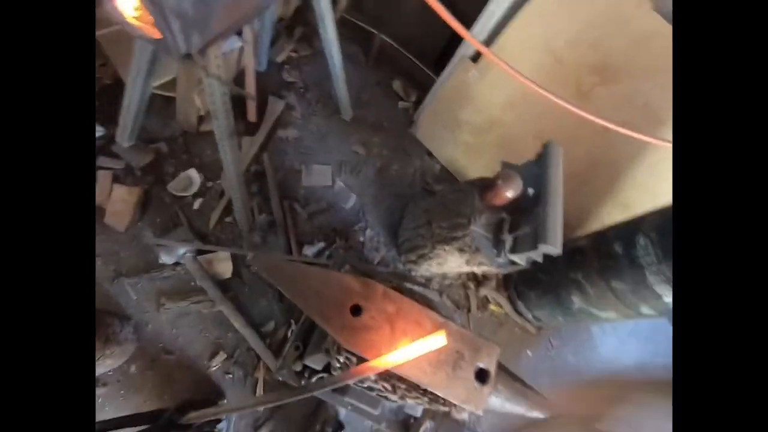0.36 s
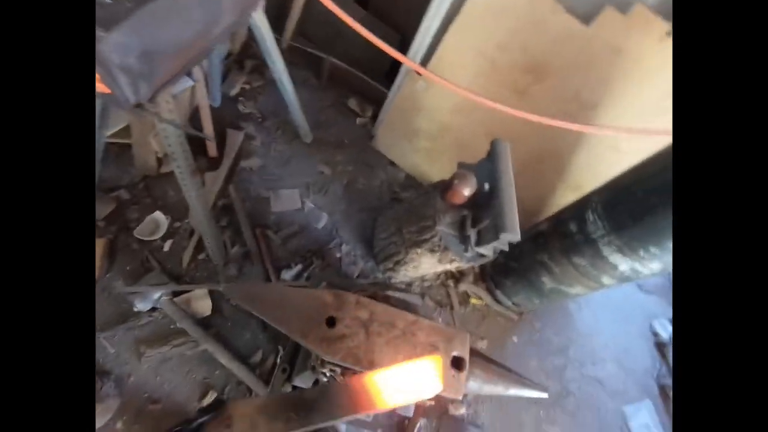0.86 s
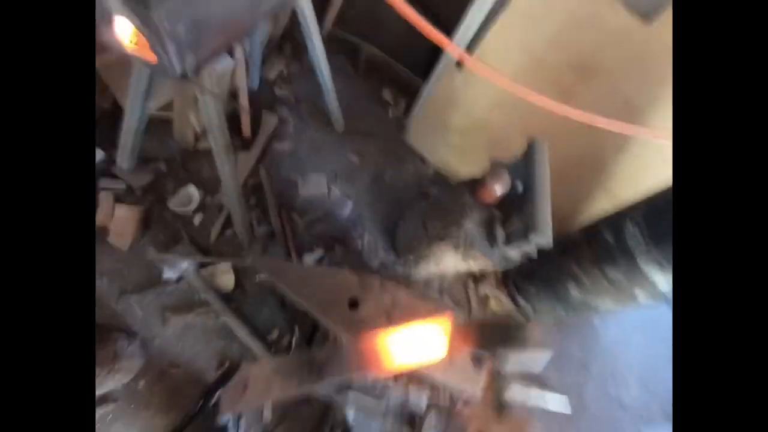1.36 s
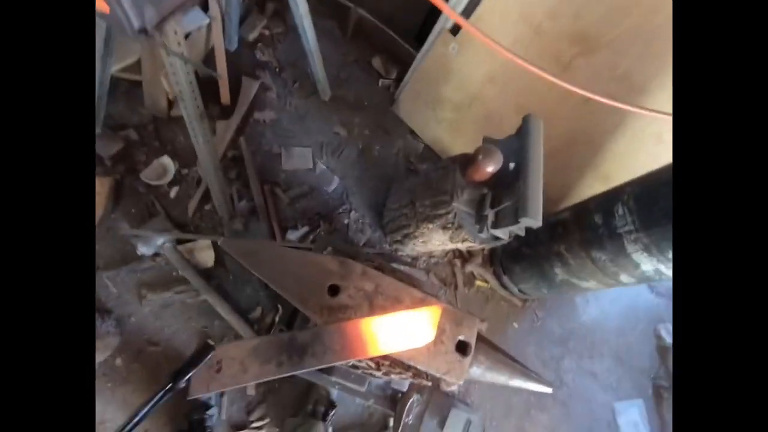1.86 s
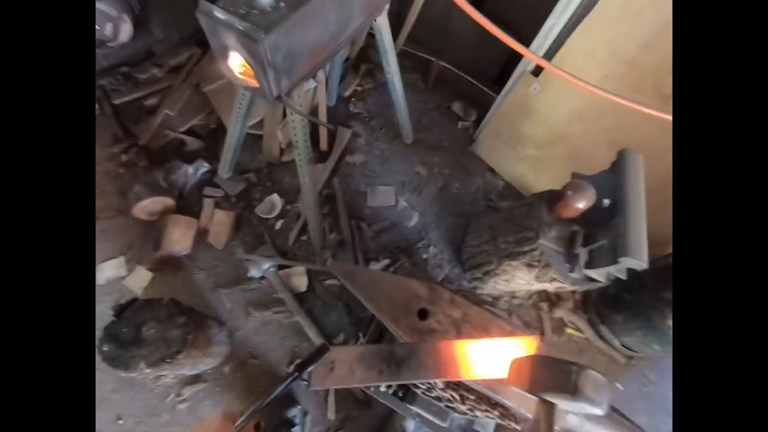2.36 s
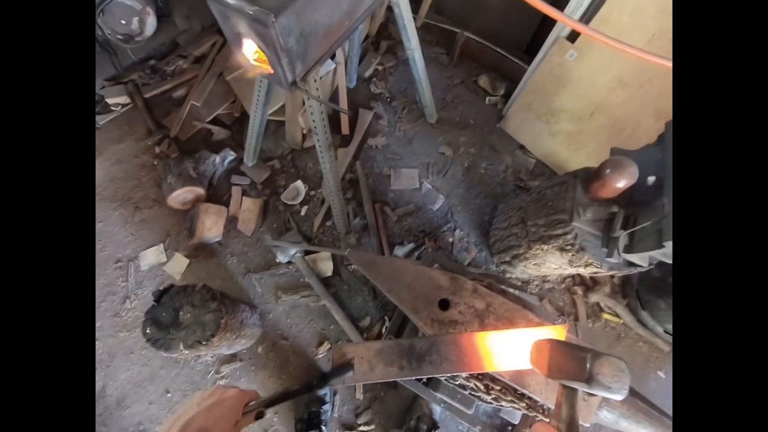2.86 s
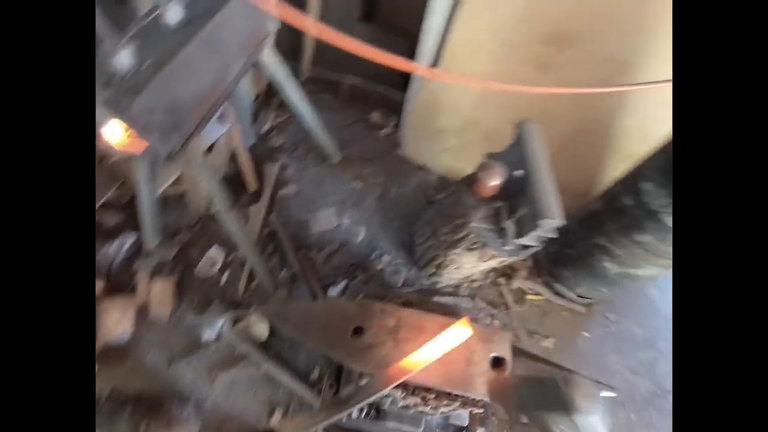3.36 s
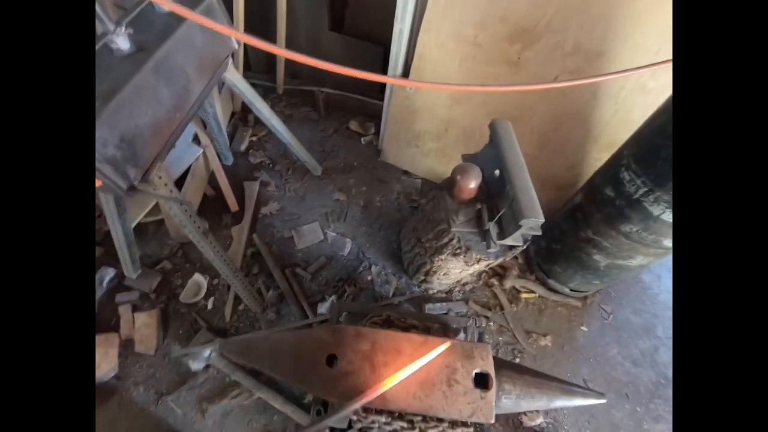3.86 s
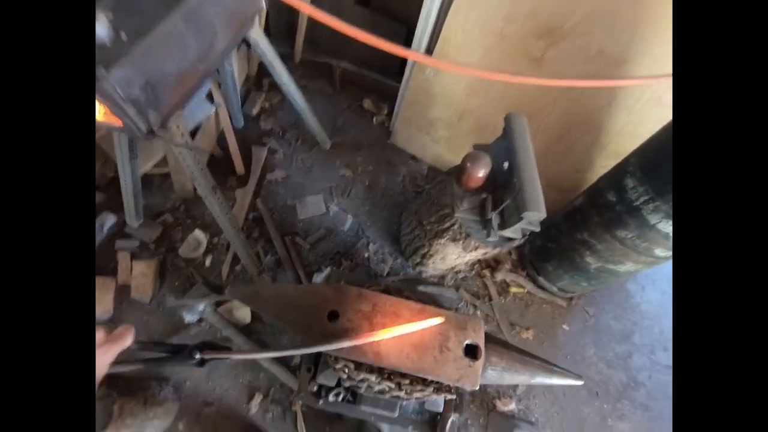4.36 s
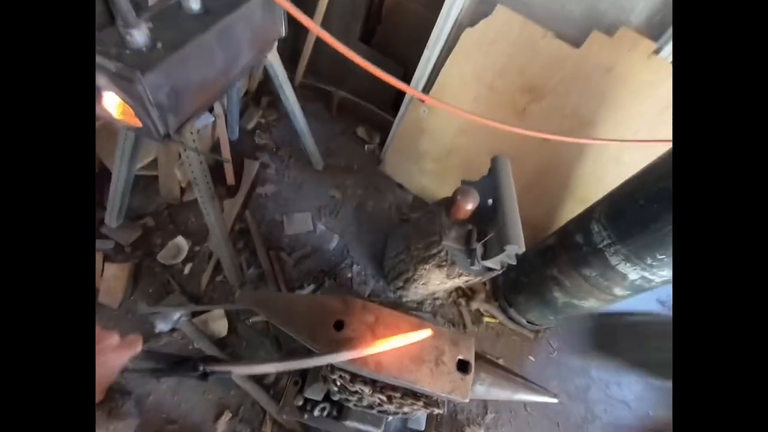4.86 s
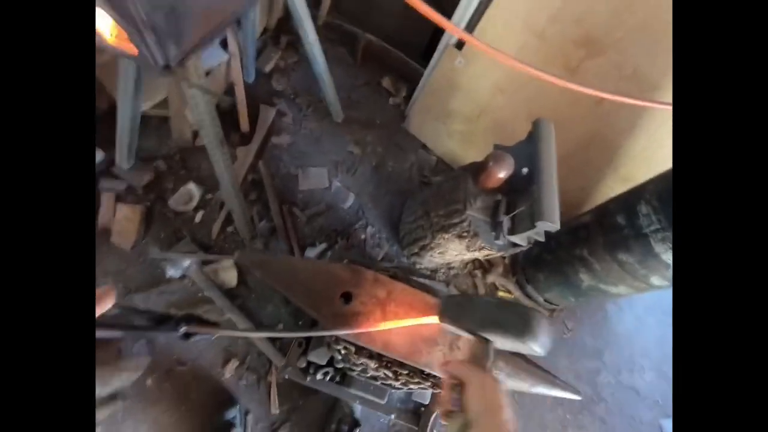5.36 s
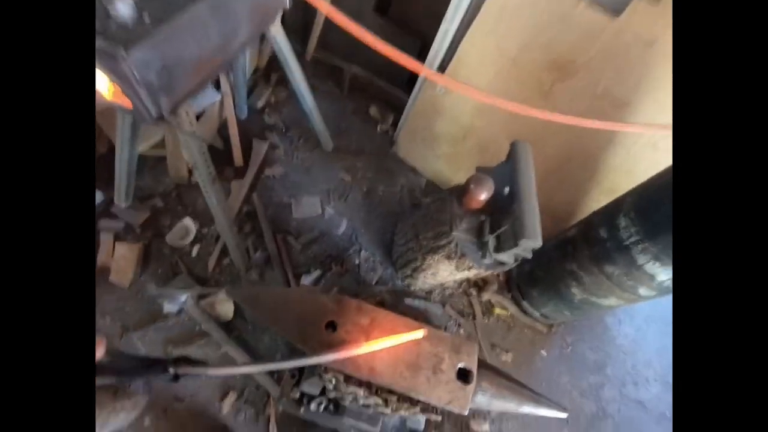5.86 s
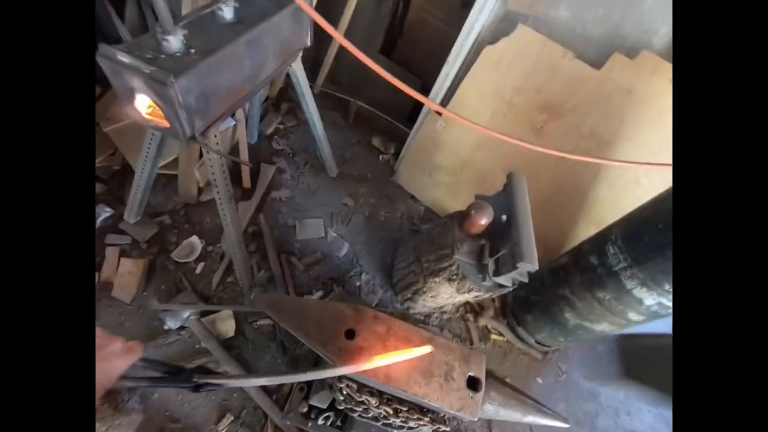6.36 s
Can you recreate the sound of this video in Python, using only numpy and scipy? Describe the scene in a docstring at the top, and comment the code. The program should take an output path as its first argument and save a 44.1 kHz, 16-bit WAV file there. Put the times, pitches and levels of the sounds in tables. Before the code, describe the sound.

Six hard hammer blows on hot steel over an anvil, each a dull crack with short ring, above a steady low gas forge roar.

```python
"""A gas forge roars and hisses beside an anvil while a hand hammer strikes hot steel six times, with three
light taps between. Each blow is a short thud with a crack, a ringing anvil, a shop echo and a low rumble;
faint ticks come too. Flame, jet and echo are shaped noise, struck steel is dying sine waves.
A small camera with two ports ducks hard at each blow, so ring and echo seem to hang before they die;
a slower stage of its limiter lets the forge swell in the pauses."""
import sys
import numpy as np
from scipy import signal
from scipy.io import wavfile
from scipy.ndimage import uniform_filter1d

SR = 44100
rng = np.random.default_rng(int(sys.argv[2]) if len(sys.argv) > 2 else 0)


def pcm_store(signal):
    """Save signal as 16-bit PCM."""
    levels = np.round(np.clip(np.atleast_2d(signal), -1, 1) * 32767)
    wavfile.write(sys.argv[1], SR, levels.astype(np.int16).T)


def makeup_ratio(level_db):
    """Linear amplitude ratio for a level in decibels (20 dB per factor of ten)."""
    decades = np.asarray(level_db, float) / 20
    return 10 ** decades


N = 285327  # length in samples

# The hammer blows. Each row: start in seconds, then the levels in dB of thud, snap, ring and rumble.
BLOWS = [(0.3728, 11.5, -16, -35.5, -33.5), (1.1994, 10, 6, -24.5, -35.5), (1.9285, 10, 5.5, -29.5, -32.5),
         (4.5808, 15.5, -1, -21.5, -35), (5.3121, 13.5, -14, -24, -31), (6.0445, 13.5, -4, -18, -32)]
# How the forge leans to one side. Each row: pitch in Hz, left level over right in dB.
FORGE_LEAN = [(60, -1), (130, -1.5), (290, -5.5), (640, -6.5), (1410, 5), (3100, 3.5), (6820, -1.5),
              (15000, 4.5)]


def read(points, hz):
    """Reads a curve of (Hz, value) points, with straight lines between them on a log-frequency axis."""
    f, value = np.transpose(points)
    return np.interp(np.log(hz + 1), np.log(f + 1), value)


def add(mix, s, sound):
    """Mixes a two-channel sound in at s seconds, cut off where the mix ends."""
    part = mix[:, round(s * SR):][:, :sound.shape[1]]
    part += sound[:, :part.shape[1]]


def sides(lean_db):
    """Left and right gains for a left-over-right level difference."""
    return makeup_ratio(np.array([lean_db / 2, -lean_db / 2]))


def noise(field_db, lean, count, size):
    """Noise from random short-time spectra of level field_db(hz, t); the two ports' mean starts at rms 1."""
    # How alike the ports hear a sound. Each row: pitch in Hz, likeness from 0 to 1.
    likeness = [(30, .75), (100, .96), (200, .995), (400, .98), (700, .85), (1500, .9), (4000, .7),
                (9000, .65), (15000, .7)]
    # How far the left port runs ahead. Each row: pitch in Hz, phase lead in radians.
    left_lead = [(30, 0.01), (340, 0.13), (1210, 1.9), (2150, 1.64), (2840, .1), (4390, 0.2), (6370, 2.47),
                 (8700, 2), (11100, 17), (12100, 9.5), (15300, 6.2)]
    hop = size // 4
    frames = count // hop + 5
    hz = np.fft.rfftfreq(size, 1 / SR)[:, None]
    a, b, c, d = rng.standard_normal((frames, len(hz), 4)).T
    shared, own = a + 1j * b, c + 1j * d
    same, lead = np.clip(read(likeness, hz), 0, 1), read(left_lead, hz)
    left, right = sides(read(lean, hz))
    mean = np.sqrt(left ** 2 + right ** 2 + 2 * left * right * same * np.cos(lead)) / 2
    at_left = left * np.exp(1j * lead) * shared
    at_right = right * (same * shared + np.sqrt(1 - same ** 2) * own)
    field = makeup_ratio(field_db(hz, np.arange(frames) * hop / SR))
    spectra = np.array([at_left, at_right]) * field / mean / np.linalg.norm(field[:, 0])
    return signal.istft(spectra, nperseg=size, noverlap=size - hop)[1][:, :count]


def flame():
    """The flame is low noise; the forge box makes it boom at a few pitches."""
    # Flame noise. Each row: pitch in Hz, relative level in dB per Hz.
    roar = [(12, -61), (20, -12.5), (43, -27), (91, -3.5), (129, -3.5), (244, 2.5), (325, -9.5), (352, -16),
            (524, -16.5), (624, -24), (900, -28), (1170, -77), (1980, -120)]
    # Booming pitches of the forge box. Each row: pitch in Hz, width in Hz, relative level in dB.
    chamber = [(186, 12.3, 5), (250.6, 12.6, 2.5), (471, 109, -16.5)]

    def roar_db(hz, t):
        boom = sum(makeup_ratio(2 * db) / (1 + (2 * (hz - f) / width) ** 4) for f, width, db in chamber)
        return 10 * np.log10(makeup_ratio(2 * (read(roar, hz) - 2.5)) + boom) + 0 * t  # 0 * t: steady in time
    return makeup_ratio(-25) * noise(roar_db, FORGE_LEAN, count=N, size=4096)


def jet():
    """The gas jet hisses and sputters: patches of the noise rise and fall over time and pitch."""
    # Jet noise. Each row: pitch in Hz, relative level in dB per Hz.
    hiss = [(530, -51.5), (900, -11), (967, -6), (1090, -7), (1560, -17), (1890, -17), (2370, -23.5),
            (3770, -22.5), (4200, -32.5), (5260, -26.5), (7710, -27), (10500, -38), (13500, -30.5),
            (15600, -79)]
    patchy_db = 1.5

    def hiss_db(hz, t):
        patches = rng.standard_normal((len(t), len(hz))).T
        patches = uniform_filter1d(patches, size=24, axis=0)
        patches = uniform_filter1d(patches, size=12, axis=1)
        patches[:, 0] = 0  # a plain first frame sets the level
        return read(hiss, hz) + patchy_db * patches / patches.std()
    return makeup_ratio(-54) * noise(hiss_db, FORGE_LEAN, count=N, size=1024)


def dying(hz, t60, t):
    """A struck tone: a sine wave that falls by 60 dB in t60 seconds."""
    return makeup_ratio(-60 * t / t60) * np.sin(2 * np.pi * hz * t)


def thud(db):
    """Soft steel gives way under the blow: a few very short tones that build up within a millisecond."""
    # Tones of the thud. Each row: pitch in Hz, time to fall by 60 dB in seconds, relative level in dB.
    tones = [(753, 0.0022, 7.5), (1198, 0.006, -4.5), (2215, 0.0027, 0), (3700, 0.0048, -4)]
    t = np.arange(SR // 2) / SR
    push = sum(makeup_ratio(tone_db) * dying(hz, t60, t) for hz, t60, tone_db in tones) * (1 - np.exp(-t / 0.00051))
    # a high-pass keeps the thud free of bass
    push = signal.sosfilt(signal.butter(3, 480, "high", fs=SR, output="sos"), push)
    late = np.roll(push, shift=4)  # the right port hears it four samples later
    return makeup_ratio(db) * sides(-5.0)[:, None] * np.array([push, late])


def stand(thud_db):
    """The stand under the anvil hums: one low tone with a soft start."""
    hz, t60, db = 101, 0.41, -27  # Hz, seconds, dB against the thud
    t = np.arange(SR // 2) / SR
    hum = dying(hz, t60, t) * (1 - np.exp(-t / 0.0099))
    return -makeup_ratio(thud_db + db) * sides(-1.0)[:, None] * hum


def crack(db):
    """The hammer face meets the steel: a burst of about three cycles with grit, that stops short."""
    hz, peak_s, width_s, grit_share = 6200, 0.00058, 0.00028, 0.44
    t = np.arange(SR // 200) / SR
    band = signal.butter(2, [2500, 12000], "band", fs=SR, output="sos")
    grit = signal.sosfilt(band, rng.standard_normal((2, len(t))))
    burst = np.exp(-((t - peak_s) / width_s) ** 2)
    return makeup_ratio(db) * sides(-5.5)[:, None] * burst * (np.sin(2 * np.pi * hz * t) + grit_share * grit)


def snap(db, hz, grit):
    """A sharp contact: a few fast cycles, a second note at a set ratio to them, and grit."""
    t60, grit_t60 = 0.0055, 0.0083  # seconds
    second_ratio, second_db = 0.29, -1
    t = np.arange(SR // 20) / SR
    band = signal.butter(2, [1100, 9500], "band", fs=SR, output="sos")
    rough = signal.sosfilt(band, rng.standard_normal((2, len(t))))
    notes = dying(hz, t60, t) + makeup_ratio(second_db) * dying(second_ratio * hz, t60, t)
    gritty = notes + grit * makeup_ratio(-60 * t / grit_t60) * rough
    return makeup_ratio(db) * gritty * (1 - np.exp(-(t / 0.000062) ** 2))


def echo(db, tilt_db):
    """The shop answers a hit with noise that dies band by band; tilt_db brightens or dulls it."""
    # Colour of the echo. Each row: pitch in Hz, relative level in dB per Hz.
    colour = [(40, -27.5), (70, 11.5), (190, 11.5), (500, -1.5), (1100, -6), (1500, -8), (2200, -10),
              (3600, -6.5), (4650, -14), (6750, -2.5), (9000, -11.5), (12400, -26), (15600, -66)]
    # How long the echo lasts. Each row: pitch in Hz, time to fall by 60 dB in seconds.
    echo_t60 = [(100, 0.38), (500, 0.46), (1500, 0.38), (4000, 0.39), (8000, 0.31), (9400, 0.21),
                (14000, 0.17)]
    # How the echo leans to one side. Each row: pitch in Hz, left level over right in dB.
    echo_lean = [(60, -7.5), (180, -2.5), (550, -10.5), (1650, 0.5), (4970, -4.5), (15000, 2)]

    def echo_db(hz, t):
        return read(colour, hz) + tilt_db * np.log2(1 + hz / 2000) - 60 * t / read(echo_t60, hz)
    count = SR // 2
    tail = noise(echo_db, echo_lean, count=count, size=1024)
    return makeup_ratio(db) * tail * (1 - np.exp(-np.arange(count) / SR / 0.00014))


def blow(thud_db, snap_db):
    """A hammer blow: echo, thud, stand and crack, then the hammer face touches a second time."""
    rebound_s = 0.0013
    # a blow with more snap for its thud has a brighter echo
    out = echo(thud_db - 23, tilt_db=0.2 * (snap_db - thud_db))
    out += thud(thud_db) + stand(thud_db)
    add(out, 0, crack(snap_db))
    add(out, rebound_s, snap(snap_db - 8, 6500, grit=0.99))
    add(out, rebound_s, snap(snap_db - 7, 3630, grit=0.3))
    return out


def ring(s, db, struck_db, grip, depth):
    """The anvil's own tones, set ringing by the blow; late returns from the walls make them swell or dip."""
    # The anvil's tones: one pitch in Hz each.
    anvil_hz = [1832, 2103, 2147, 2590, 3176, 3470, 3601, 3664, 4112, 4424, 4884, 5041, 5310, 5554, 6058,
                6480, 6893, 8341, 8702, 10152, 10541, 11988, 13849, 15298]
    # One row per tone: free time to fall by 60 dB in seconds, left level over right in dB,
    # swell as the share that the walls add (or cancel, if negative).
    ringing = [(0.3, -2, 0.18), (0.42, 8, 0.3), (0.4, -1, 0.32), (0.41, 2, 0.57), (0.3, 1, -0.13),
               (0.37, -4, 0.051), (0.45, -1, 0.74), (0.34, -3, -0.25), (0.42, -1, 0.6), (0.41, 3, 0.73),
               (0.23, 5, 0.3), (0.49, -7, 0.9), (0.2, -9, 0.25), (0.29, -8, -0.35), (1.0, -13, 0.43),
               (0.25, -16, 0.3), (0.36, -7, -0.017), (0.16, 11, 0.13), (0.58, -5, 0.76), (0.65, -5, 0.69),
               (0.25, -11, 0.3), (0.37, 4, 0.3), (0.52, -6, 0.3), (0.67, -4, 0.6)]
    # Single tones that well up or sink for a moment. Each row: moment in seconds from the start of
    # the scene, pitch in Hz, rise in dB, half width in seconds.
    swells = [(.45, 6058, 5, .04), (.53, 4112, 14, .05), (.55, 4424, 12, .05), (1.23, 3664, 6, .03),
              (1.37, 2103, 6, .05), (1.36, 6058, 7, .04), (1.42, 6058, -7, .025), (1.36, 3664, 6, .04),
              (1.95, 6058, -6, .025), (1.95, 8702, -7, .03), (1.97, 2147, 4, .04), (2.12, 3664, 5, .06),
              (4.6, 5041, -4, .03), (4.6, 8702, -6, .03), (4.7, 3601, 11, .07), (4.79, 5041, 6, .07),
              (4.8, 8702, 7, .09), (4.65, 2590, 5, .04), (5.35, 3664, 5, .03), (5.4, 2590, 9, .04),
              (5.43, 6058, 7, .045), (5.47, 3601, 8, .05), (6.12, 2590, 7, .04)]
    flutter_hz, flutter_rise_s, flutter_calm_s = 42.1, 0.04, 0.35
    t = np.arange(4 * SR // 5) / SR
    slow = t[::10]  # slow changes are worked out at every tenth sample
    t60, lean, swell = np.transpose(ringing)[:, :, None]
    hz = np.array(anvil_hz)[:, None]
    start, port, late = rng.random((len(hz), 3, 1)).transpose(1, 0, 2)
    turn, beat = rng.random((len(hz), 2, 3, 1)).transpose(1, 2, 0, 3)
    walls = (swell + 0.5j * (late - 0.5)) * (1 - np.exp(-slow / 0.17))
    late_db = 0
    for peak, f, rise_db, width in swells:
        chosen = abs(hz / f - 1) < 0.01
        late_db = late_db + rise_db * chosen * np.exp(-((s + slow - peak) / width) ** 2)
    # three close side tones make each tone flutter; the flutter builds up and settles
    flutter = depth * np.exp(2j * np.pi * (turn + flutter_hz * (beat - 0.5) * slow)).sum(0)
    flutter *= (1 - np.exp(-slow / flutter_rise_s)) * np.exp(-slow / flutter_calm_s)
    at_left = np.exp(1.6j * (port - 0.5)) * (1 + walls + flutter)
    at_right = 1 + walls - 1j * flutter
    ports = sides(lean) * np.array([at_left, at_right])
    ports *= makeup_ratio(db + np.array(struck_db)[:, None] + late_db - 60 * slow / (grip * t60))
    tones = np.repeat(ports, 10, axis=2) * np.exp(2j * np.pi * (hz * t + start))
    return tones.real.sum(1) * (1 - np.exp(-t / 0.0052))


def rumble(db):
    """Lumpy low noise, mostly in the right port, that follows a blow, holds and then stops."""
    top_hz, length_s, lean_db = 36, 0.225, -14
    t = np.arange(SR // 2) / SR

    def low_db(hz, t):
        return -10 * np.log10(1 + (hz / top_hz) ** 4 + (14 / (hz + 1)) ** 4) + 0 * t
    low = noise(low_db, [(1, lean_db), (2, lean_db)], count=len(t), size=4096)
    low = low / low[:, :round(length_s * SR)].mean(0).std()
    rise = 1 - np.exp(-(t / 0.022) ** 2)
    return makeup_ratio(db) * low * rise / (1 + np.exp((t - length_s) / 0.012))


def tick(db, hz, t60):
    """One short, high, dying note with a grain of grit, and its echo."""
    t = np.arange(SR // 2) / SR
    note = makeup_ratio(db) * dying(hz, t60, t) * (1 - np.exp(-t / 0.0016))
    out = note + echo(db - 15.5, tilt_db=-3.5)
    add(out, 0, snap(db - 3.5, hz, grit=0.6))
    return out


def chatter(db, hz):
    """The loose bar chatters after a tap: random tiny knocks that die away, each a short note."""
    knocks_per_s, chatter_t60, knock_t60 = 350, 0.17, 0.0032
    t, grain = np.arange(SR // 5) / SR, np.arange(SR // 50) / SR
    chance, size = rng.random((len(t), 2)).T
    knocks = (chance < knocks_per_s / SR) * (2 * size - 1) * makeup_ratio(db - 60 * t / chatter_t60)
    return sides(-7.0)[:, None] * signal.oaconvolve(knocks, dying(hz, knock_t60, grain))


def tap(snap_db, hz, clack_db, clack_hz, echo_db):
    """A light tap of steel on steel: a snap, then a clack, with chatter and echo."""
    grit = 0.24
    out = echo(echo_db, tilt_db=-0.5)
    add(out, 0, chatter(snap_db - 1, hz))
    add(out, 0, chatter(snap_db - 5, 3650))
    add(out, 0, snap(snap_db, hz, grit))
    add(out, 0.0015, snap(clack_db, clack_hz, grit))
    return out


def scene():
    """Lays blows, ringing, taps and ticks over the steady forge."""
    # How strongly each blow sets each anvil tone ringing, by where it lands.
    # Each row: one blow, with a level in dB for every tone of the anvil.
    struck = [(-3, -3, 1, -3, -11, -16, -8, 1, -5, -8, -25, -6, 10, 13, 1, -41, 7, 14, 4, -3, 7, -10, 0, -44),
              (5, -13, 2, -4, -9, -19, -24, 0, -8, -25, -44, -13, -4, 0, -19, -14, -21, -12, -13, -35, -10, -38, -36, -38),
              (7, -15, 2, -18, -5, -19, -29, 8, -1, -28, -42, -20, -33, 2, -11, -12, -45, -38, -7, -33, -12, -41, -26, -36),
              (8, -2, -3, -2, 6, -4, -6, 2, 10, 0, 6, 5, 9, 0, -21, -40, -43, -18, -2, -35, -9, -45, -33, -20),
              (-9, -10, -4, -7, 1, -9, -10, -1, -2, -17, -45, -15, -10, -6, -18, -40, -8, -5, -17, -25, -4, -24, -13, -44),
              (-8, -22, -2, -17, -10, -31, -20, 3, -11, -17, -30, -22, -21, -35, -31, -45, -23, -8, -18, -26, -32, -38, -21, -45)]
    # How freely the anvil rings. Each row: one blow, with share of the free decay time, flutter depth.
    grips = [(0.87, 0.45), (0.99, 0.45), (1.11, 0.35), (0.94, 0.35), (0.87, 0.45), (0.84, 0.45)]
    # Light taps; the first two rows almost coincide. Each row: start in seconds, snap level in dB,
    # snap pitch in Hz, clack level in dB, clack pitch in Hz, echo level in dB.
    taps = [(2.4877, -21, 6430, -22, 2780, -32), (2.5015, -23.5, 6400, -40, 3500, -42),
            (2.6263, -24, 6630, -31, 2700, -38.5), (2.7526, -24.5, 6770, -26, 3780, -40.5)]
    # The first row is a faint smear just before the second blow; the others are ticks of loose steel.
    # Each row: start in seconds, level in dB, pitch in Hz, time to fall by 60 dB in seconds.
    ticks = [(1.189, -37, 3980, 0.01), (2.1639, -24.5, 3900, 0.0076), (2.5042, -29.5, 3450, 0.024),
             (2.507, -38, 6700, .015), (2.5146, -32, 3900, 0.014), (2.608, -36, 3700, 0.0087),
             (2.6095, -38, 6760, .01), (2.6276, -29.5, 6200, .008), (2.6355, -35.5, 6840, .025),
             (2.637, -49, 3860, 0.045), (2.666, -48, 3840, 0.031), (2.701, -38, 3840, 0.022),
             (3.873, -44.5, 3380, 0.0075)]
    mix = flame() + jet()
    for (s, thud_db, snap_db, ring_db, _), struck_db, grip in zip(BLOWS, struck, grips):
        add(mix, s, blow(thud_db, snap_db))
        add(mix, s, ring(s, ring_db, struck_db, *grip))
    for s, *row in taps:
        add(mix, s, tap(*row))
    for s, *row in ticks:
        add(mix, s, tick(*row))
    return mix


def limiter(sound):
    """Ducks at once when the treble is loud and recovers steadily; a slower stage follows and creeps back."""
    split_hz, ceiling_db, release_db_per_s = 330, -17.5, 110
    bass_share = 0.42  # the bass ducks by this share only
    # the slow stage takes a share of the excess, follows late, creeps back and starts turned down
    slow_share, slow_s, slow_lag_s, start_db = 0.41, 0.53, 0.025, 3.5
    bass = signal.sosfiltfilt(signal.butter(2, split_hz, fs=SR, output="sos"), sound)
    treble = sound - bass
    power_db = 10 * np.log10(abs(uniform_filter1d((treble ** 2).mean(0), size=88)) + 1e-12)
    fall = np.arange(N) * release_db_per_s / SR
    held_db = np.maximum.accumulate(power_db + fall) - fall  # jumps up at once, falls steadily
    over_db = uniform_filter1d(np.maximum(held_db - ceiling_db, 0), size=20)
    creep = np.arange(N) / SR / slow_s
    held = np.maximum.accumulate(np.log(np.maximum(slow_share * over_db, 1e-9)) + creep)
    slow_db = np.exp(np.maximum(held, np.log(start_db)) - creep)
    keep = np.exp(-1 / (slow_lag_s * SR))
    slow_db = signal.lfilter([1 - keep], [1, -keep], slow_db, zi=[keep * start_db])[0]
    return (treble / makeup_ratio(over_db) + bass / makeup_ratio(bass_share * over_db)) / makeup_ratio(slow_db)


def top_cut(x):
    """Nothing passes above the cut-off."""
    return signal.sosfilt(signal.butter(12, 15740, fs=SR, output="sos"), x)


def record(dry):
    """The camera's ports dull the top and its limiter ducks the sound; the rumble joins after the limiter."""
    dulled = signal.sosfilt(signal.butter(2, 13500, fs=SR, output="sos"), dry)
    mix = limiter(dulled)
    for s, *_, rumble_db in BLOWS:
        add(mix, s, rumble(rumble_db))
    return top_cut(mix)


dry = scene()
out = record(dry)
pcm_store(out)
```